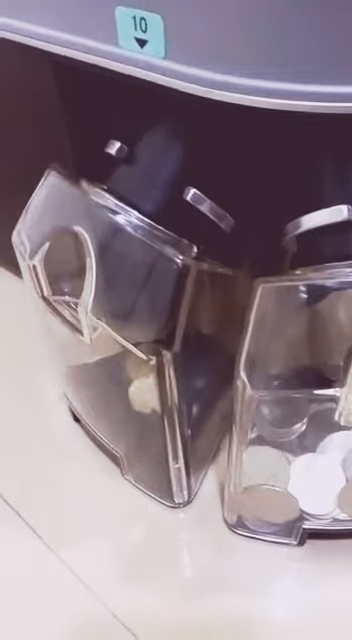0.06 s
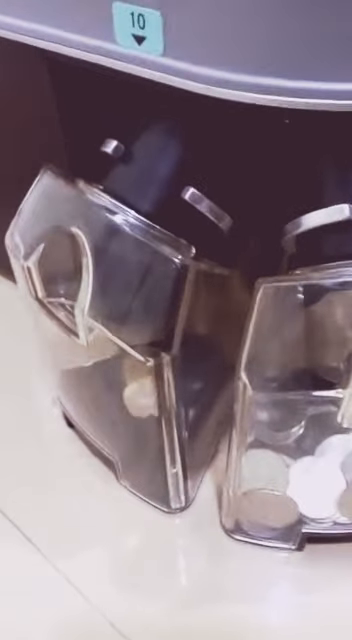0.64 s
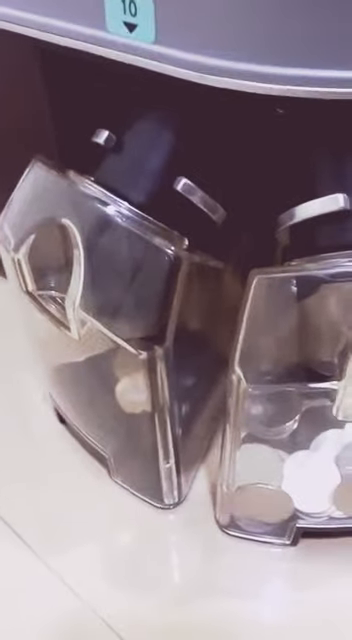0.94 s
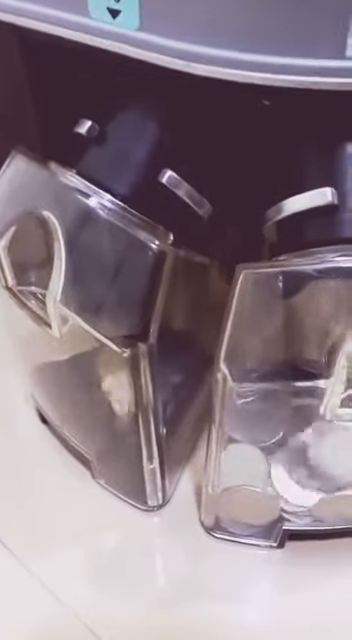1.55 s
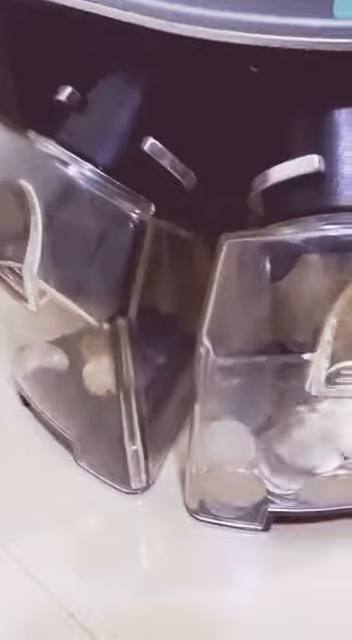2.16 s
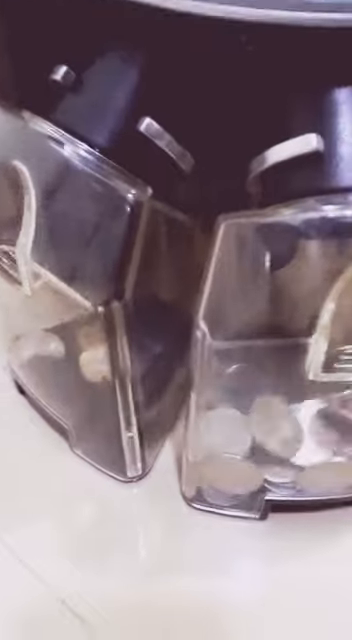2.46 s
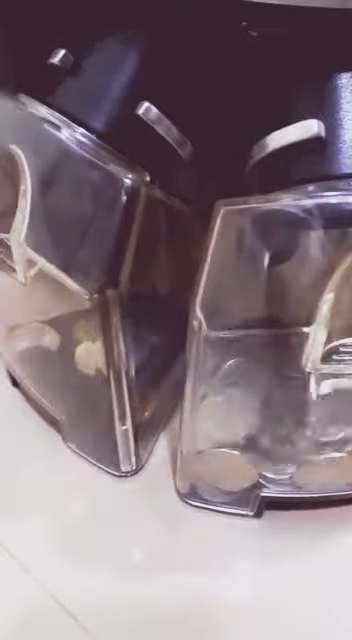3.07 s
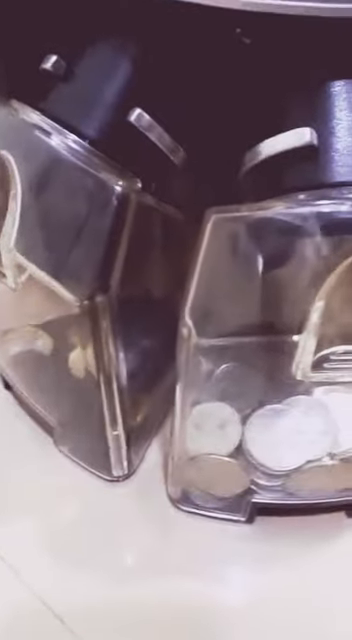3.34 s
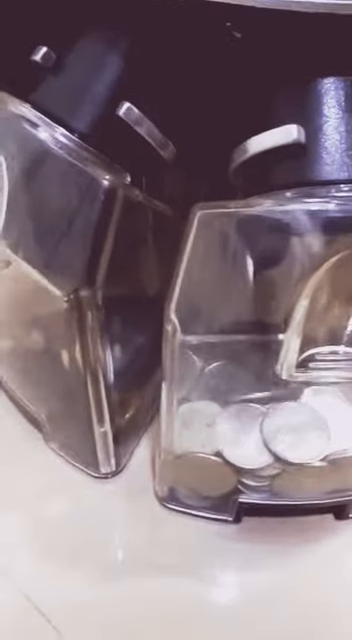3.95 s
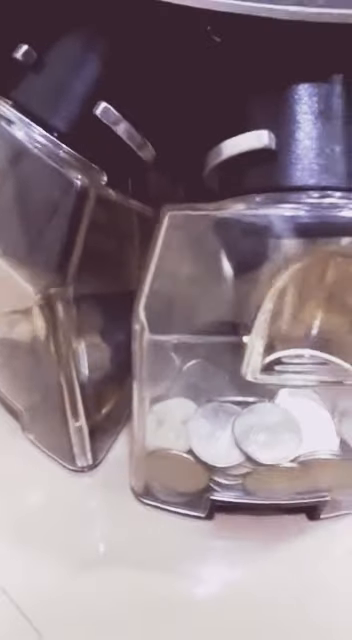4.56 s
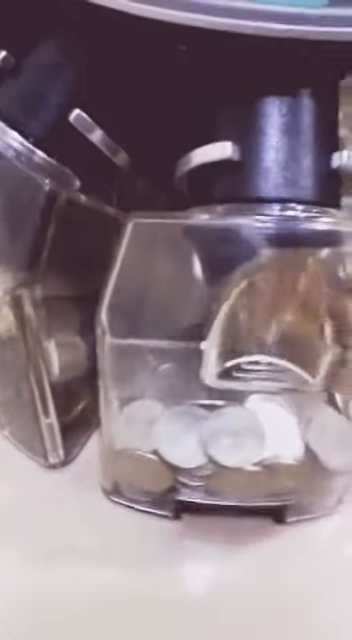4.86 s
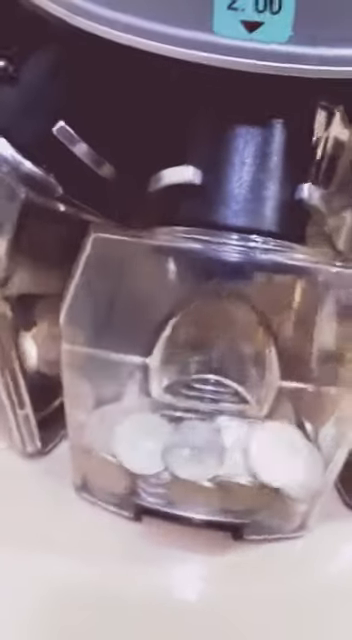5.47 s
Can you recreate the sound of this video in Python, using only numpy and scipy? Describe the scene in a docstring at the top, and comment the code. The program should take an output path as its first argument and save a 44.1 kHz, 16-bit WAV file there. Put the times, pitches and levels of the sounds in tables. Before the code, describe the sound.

Heard up close in a small room, an electric coin sorter starts with uneven scraping, a rumbling drive and sharp clacks of coin on coin. It settles into dense, bright jingling, with ringing clinks and hollow knocks as coins land in plastic bins. Toward the end the jingling dips, a single coin clunks and bounces on a bin floor, and the clatter returns.

```python
"""Coin sorter on a table

An electric coin sorter, close to a stereo pair of microphones in a small room. Its disc churns
a heap of coins in a plastic hopper, where loose ones hop and chink; coins clack along the track
and knock into plastic bins. Near the end the heap goes quiet, one coin drops hard and bounces,
then the churning picks up again."""
import sys
import numpy as np
from scipy import signal
from scipy.io import wavfile

SR = 44100
rng = np.random.default_rng(int(sys.argv[2]) if len(sys.argv) > 2 else 0)


def put_to_file(sound):
    """Save the sound as 16-bit audio at rate SR, in the file named by the first command-line argument."""
    columns = np.atleast_2d(sound).T  # one column per channel
    safe = np.clip(columns, -1, 1)
    whole_steps = np.round(safe * 32767)
    wavfile.write(sys.argv[1], SR, whole_steps.astype(np.int16))


N = 242991
TIME, AGE = np.arange(N) / SR, np.arange(SR // 5) / SR  # seconds into the scene, and after a blow
LEAD_S = 16 / SR  # travel time between the microphones

# decay of the room: pitch_hz, t60_s
ROOM_DECAY = [(100, 0.037), (600, 0.18), (3000, 0.17), (8000, 0.058), (16000, 0.07)]
# spectra of room tone, drive, scraping, buried coins and loose coins: pitch_hz, gain_db
ROOM_TONE_EQ = [(20, -17), (36, -29), (50, -30), (70, -20), (200, -0.5), (1000, -18.5), (8000, -20),
                (16000, -29)]
RUMBLE_EQ = [(25, -55), (70, -31), (100, -3), (130, -8), (160, 0.5), (205, 7), (240, 9.5), (310, -4),
             (400, 3.5), (600, -53.5)]
SCRAPE_EQ = [(150, -27), (400, -10), (600, -9), (1150, -1.5), (1500, 0), (1950, 2.5), (2400, -3.5),
             (3200, -2.5), (6000, -8.5), (16000, -77)]
CLATTER_EQ = [(1200, -31.5), (2400, -2), (3400, 1), (4300, 1.5), (5500, 2.5), (6500, 0), (7600, 3.5),
              (10000, -34), (16000, -53)]
JINGLE_EQ = [(3000, -41), (6000, 1), (7800, 0.5), (9200, 3.5), (10600, 4), (12000, 1), (13500, -3.5),
             (15500, -11.5)]

# the disc jolts against the heap and thumps the casing: start_s, level_db, pitch_hz
CASING_THUMPS = [(0.391, -30, 195), (0.652, -23.5, 156), (0.75, -15.5, 248), (0.803, -21, 228),
                 (1.192, -22, 208), (5.445, -22, 166)]
# the disc drags against the heap: start_s, length_s, scrape_db, rumble_db, singing_db, singing_hz
DISC_DRAGS = [(0.089, 0.13, -31.5, -41.5, -34, 1545), (0.281, 0.11, -33, -39.5, -54, 1450),
              (0.473, 0.15, -33.5, -44, -41, 1480), (0.63, 0.22, -33.5, -39, -35.5, 1560),
              (0.839, 0.14, -35.5, -40, -28, 1412), (1.002, 0.12, -37.5, -38, -36, 1380),
              (1.148, 0.086, -36, -39, -39, 1650), (1.78, 0.072, -31, -72, -51, 1260),
              (2.05, 0.089, -38.5, -64, -37, 1550), (2.842, 0.15, -31.5, -42, -31.5, 1423),
              (3.18, 0.22, -39.5, -48, -43, 1550), (3.777, 0.27, -40.5, -50, -40, 1470),
              (4.534, 0.066, -33, -58, -41, 1304), (4.696, 0.084, -31.5, -43.5, -47.5, 1620),
              (4.855, 0.61, -43, -46, -62, 1630), (5.416, 0.07, -34.5, -53, -47, 1680)]
DRAG_RISE_S, DRAG_T60_S, SING_SAG_HZ_PER_S = 0.027, 0.29, 370

# modes of the coins on the track, in low, middle, upper middle and high groups: pitch_hz, t60_s, level_db
TRACK_COIN_MODES = [
    [(3136, 0.037, 2.5), (3250, 0.02, -4)],
    [(4945, 0.04, 5), (5060, 0.03, -1)],
    [(5350, 0.036, 4), (5746, 0.043, 0)],
    [(7074, 0.044, 3), (7330, 0.025, -3)],
]
COIN_DETUNE = 0.006  # coins differ in size, so their rings vary in pitch by this share
# flow of coins along the track: time_s, low_ring_db, middle_ring_db, high_ring_db
TRACK_FLOW = [(0, -42, -37, -50), (.25, -59, -48, -47), (.46, -48, -38, -48), (.7, -55, -44.5, -47),
              (1.25, -45, -36.5, -38.5), (1.45, -42, -34, -34), (1.7, -36, -33.5, -33),
              (2.0, -33.5, -39, -52), (2.2, -36.5, -32.5, -37), (2.8, -41.5, -35.5, -36),
              (3.25, -36.5, -35, -44), (3.38, -41.5, -39, -32), (3.5, -39, -38, -40),
              (3.76, -39, -35.5, -34.5), (4.0, -38, -40, -36), (4.45, -36.5, -35, -36.5),
              (4.62, -35.5, -33, -38), (4.85, -49, -66, -58), (5.38, -47, -72, -51),
              (5.51, -51, -25.5, -34)]
# hard blows on the track: start_s, level_db, middle_ring_relative_db
TRACK_CLINKS = [(0.4634, -21, -12), (1.4834, -25, 8), (1.5208, -19, -1), (1.6226, -17, -4),
                (1.642, -17, -2), (1.6954, -19, 1), (1.737, -17, 1), (1.7566, -18, -11),
                (1.7716, -16.5, -0.5), (1.8673, -17, 2), (1.8876, -21.5, 8.5), (1.927, -26, -11),
                (1.971, -13.5, -14), (1.9897, -17, -15), (2.2458, -13.5, -13), (2.445, -20.5, -6),
                (2.581, -15, -13), (2.6656, -17, -11), (2.6763, -19, -15), (2.7325, -22, -11),
                (2.758, -16.5, -14), (2.834, -11, -12), (2.987, -13.5, -19), (3.079, -15, -8),
                (3.5002, -16.5, -8), (3.5139, -19.5, -16), (3.616, -14.5, -25), (3.636, -19, -17),
                (3.706, -18, -14), (3.7412, -17.5, -4), (3.8613, -20, -11), (4.2356, -19, -17),
                (4.4949, -13.5, -17), (4.657, -18, 0)]
# coins spinning on their rims: start_s, length_s, level_db, pitch_hz
COIN_SPINS = [(0.903, 0.05, -35, 5800), (1.45, 0.48, -37.5, 5770), (1.87, 0.26, -37, 4900),
              (3.3, 0.14, -29.5, 7120), (4.378, 0.04, -32, 7100), (4.87, 0.035, -36, 8840)]

# modes of a bin: pitch_hz, t60_s, level_db, left_minus_right_db
BIN_MODES = [(387, 0.072, -5, -12), (455, 0.07, -3.5, -14), (525.3, 0.095, 5, -8), (676, 0.045, -1, -4),
             (749, 0.073, 4.5, -16), (826, 0.036, 7, -12.5), (884, 0.062, 9, 9.5), (946, 0.066, 3.5, 11.5),
             (1187, 0.023, 4, 15.5), (1316, 0.03, 3.5, -11)]
BIN_DETUNE = 0.025  # spread of a bin's pitches from blow to blow, as a share
# coins knock on the bins, each spot favouring one pitch: start_s, level_db, struck_hz
BIN_KNOCKS = [(0.039, -25.5, 880), (0.093, -25, 883), (0.107, -23.5, 853), (0.12, -15.5, 850),
              (0.131, -24, 846), (0.174, -19, 413), (0.187, -21, 840), (0.213, -21.5, 500),
              (0.634, -25.5, 900), (0.667, -34, 920), (1.558, -26, 800), (1.793, -21, 1200),
              (1.85, -21.5, 540), (1.907, -26, 1010), (1.94, -23.5, 580), (2.04, -30, 510),
              (2.135, -27, 960), (2.183, -24, 940), (2.384, -27.5, 530), (2.42, -25, 412),
              (2.445, -24.5, 880), (2.478, -28, 870), (2.513, -27.5, 872), (2.552, -27, 900),
              (2.641, -24, 740), (2.648, -25, 520), (2.663, -30, 891), (2.814, -20, 885),
              (2.865, -23.5, 525), (3.162, -27, 506), (3.241, -27, 516), (3.318, -24.5, 530),
              (3.335, -27, 1000), (3.637, -25.5, 820), (3.82, -29, 880), (3.841, -21.5, 820),
              (3.89, -21.5, 864), (3.919, -30, 525), (3.936, -21, 800), (4.009, -26, 740),
              (4.106, -22, 910), (4.11, -26, 503), (4.175, -25, 910), (4.378, -27, 937),
              (4.464, -28.5, 860), (4.573, -22.5, 855), (4.602, -23.5, 980)]
# coins rattle in a bin: start_s, length_s, level_db
BIN_RATTLES = [(0.033, 0.14, -34), (0.633, 0.061, -38.5), (1.772, 0.15, -39.5), (2.03, 0.19, -43.5),
               (2.445, 0.16, -43.5), (2.76, 0.23, -43), (3.13, 0.26, -44), (3.658, 0.05, -42.5),
               (3.793, 0.13, -33.5), (4.064, 0.22, -42.5), (4.533, 0.049, -37), (4.966, 0.5, -46.5)]
RATTLE_SPILL = 0.3  # share of a rattle that reaches all modes, wherever the coin lies
# modes of the floor of the nearest bin: pitch_hz, t60_s, level_db
BIN_FLOOR_MODES = [(558, 0.03, 3), (686, 0.02, 2), (855, 0.018, -7), (1120, 0.048, -17)]
# one coin falls hard onto that floor and bounces: start_s, level_db
DROP_BOUNCES = [(4.8085, -4), (4.8225, -2), (4.838, -16), (4.852, -11.5), (4.877, -13)]
# the same coin rocks there: start_s, length_s, level_db
DROP_ROCKING = (4.826, 0.086, -34.5)

# churning of the heap in the hopper: time_s, clatter_db, jingle_db
HEAP_LEVELS = [(0.0, -22.5, -29), (0.11, -34, -36), (0.15, -52, -38), (0.17, -40, -35.5),
               (0.28, -33.5, -38), (0.35, -31.5, -30.5), (0.425, -28.5, -26), (0.437, -42, -37),
               (0.51, -28.5, -35), (0.62, -47, -42), (0.685, -40, -39), (0.72, -27.5, -33),
               (0.81, -35, -36.5), (0.92, -25, -32), (1.01, -28, -33.5), (1.28, -33.5, -34),
               (1.32, -29.5, -30), (1.53, -29, -31.5), (2.13, -26.5, -31), (2.74, -29.5, -31.5),
               (4.63, -28.5, -31), (4.78, -34, -34.5), (4.8, -58, -44), (4.86, -38, -44.5),
               (4.89, -32, -39), (4.96, -47.5, -38), (5.02, -41, -43.5), (5.38, -39.5, -43),
               (5.5, -29, -32)]
TUMBLE_HZ = 34  # mean rate of the heap's small avalanches
# flurries of small coins: start_s, length_s, level_db
FLURRIES = [(0.0, 0.11, -42), (0.177, 0.13, -39), (0.333, 0.098, -37), (0.7, 0.21, -41), (4.2, 0.17, -40),
            (4.643, 0.13, -37), (4.867, 0.11, -41)]
# sharp clacks of coin on coin: start_s, level_db
COIN_CLACKS = [(0.0074, -14), (0.0938, -8.5), (0.17, -9), (0.4473, -7.5), (0.479, -9), (0.536, -8),
               (0.592, -10.5), (0.634, -9.5), (4.653, -13), (4.779, -14), (4.808, -17), (4.8214, -8),
               (4.877, -12), (4.9478, -17), (4.9905, -18)]
# coins left ringing after they land: start_s, level_db, pitch_hz, t60_s
COIN_PINGS = [(0.347, -21, 10200, 0.076), (0.447, -17, 10440, 0.018), (4.917, -27, 8800, 0.04),
              (4.949, -18, 9670, 0.015), (4.99, -19.5, 9300, 0.015)]
# modes of a loose coin: pitch_hz, t60_s, level_db
COIN_MODES = [(9800, 0.037, -3), (10490, 0.1, 1), (11300, 0.051, -2), (12250, 0.033, -6)]
# hardest landings of loose coins on top of the heap: start_s
LANDINGS = [1.2387, 1.341, 1.4075, 1.4772, 1.6167, 1.6533, 1.6927, 1.7273, 1.767, 1.8783, 1.927, 2.0246,
            2.2037, 2.2689, 2.419, 2.491, 2.535, 2.6879, 2.789, 2.822, 2.918, 3.035, 3.129, 3.4036, 3.4412,
            3.552, 3.787, 3.9455, 4.04, 4.3404, 4.429]
HOP_DB, HOP_S = -4.5, 0.038  # relative level and spacing of the lighter hops between them


def amp(db):
    """Decibels to gain."""
    return 10 ** (np.asarray(db) / 20)


def pan(db):
    """Left and right gains; positive leans to the left microphone."""
    return amp([[db / 2], [-db / 2]])


def follow(table):
    """One gain curve for each dB column of a table."""
    times, *columns = np.transpose(table)
    return [amp(np.interp(TIME, times, db)) for db in columns]


def swell(s, length, db, rise_s, t60):
    """Gain of one event: it rises, holds to the end of its length and dies away."""
    age = TIME - s
    return np.clip(age / rise_s, 0, 1) * amp(db - 60 * np.maximum(age - length, 0) / t60)


def together(gains):
    """Independent sounds add in power."""
    return np.sqrt(sum(gain ** 2 for gain in gains))


def latest(starts):
    """Index of the most recent event at each sample."""
    return np.maximum(np.searchsorted(np.sort(starts), TIME) - 1, 0)


def curve_at(points, hz):
    """Joins points by straight lines over log frequency."""
    points_hz, values = np.transpose(points)
    return np.interp(np.log(hz + 1), np.log(points_hz), values)


def convolve(x, response):
    """Convolution along time, cut to the length of the scene."""
    return signal.oaconvolve(np.atleast_2d(x), np.atleast_2d(response), axes=1)[:, :N]


def colour(x, points):
    """Minimum-phase filter through (pitch_hz, gain_db) points."""
    log_gain = np.log(amp(curve_at(points, abs(np.fft.fftfreq(4096, 1 / SR)))))
    spectrum = np.exp(np.conj(signal.hilbert(log_gain)))
    return convolve(x, np.fft.ifft(spectrum).real[:2048])


def passband(x, hz, kind, order=4):
    """Low-, high- or band-pass filter."""
    return signal.sosfilt(signal.butter(order, hz, kind, fs=SR, output="sos"), x)


def levelled(x, band_hz=(20, 20000)):
    """Scales a pair so that its centre has rms 1 within a band."""
    return x / passband(x.mean(0), band_hz, "band").std()


def add(mix, s, sound):
    """Mixes a sound in at time s."""
    part = mix[:, max(round(s * SR), 0):][:, :sound.shape[1]]
    part += sound[:, :part.shape[1]]


def fade(t60):
    """Free decay after a blow."""
    return amp(-60 * AGE / t60)


def ring(hz, t60, lead_s=LEAD_S):
    """A struck mode, reaching the left microphone a little later."""
    age = np.maximum(AGE - np.array([[lead_s], [0]]), 0)
    return np.sin(2 * np.pi * hz * age) * fade(t60)


def impacts(per_s, spread_db):
    """Random blows of uneven strength."""
    strength = amp(spread_db * np.minimum(rng.exponential(1, N), 3))
    return strength * rng.choice([-1, 1], N) * (rng.random(N) < per_s / SR)


def crack(t60):
    """A contact scattered by the plastic walls, differently toward each microphone."""
    burst = rng.standard_normal((2, len(AGE))) * fade(t60)
    return burst / np.linalg.norm(burst[0])


def left_first(x, stray_db):
    """Sound reaches the left microphone first; a share strays round the casing to both."""
    direct = np.array([x, np.roll(x, round(LEAD_S * SR))])
    return direct + amp(stray_db) * convolve(x, crack(0.014))


def right_first(x, stray_db):
    """Sound reaches the right microphone first; a share strays round the casing to the left."""
    stray = convolve(x, crack(0.016))[0]
    return np.array([np.roll(x, round(LEAD_S * SR)) + amp(stray_db) * stray, x])


def room(x, wet_db):
    """Adds the short tail of a small room."""
    hz, t, noise = signal.stft(rng.standard_normal((2, SR // 3)), SR, nperseg=256)
    decay = amp(-60 * t / curve_at(ROOM_DECAY, hz)[:, None])
    tail = signal.istft(noise * decay, SR, nperseg=256)[1]
    tail[:, :SR // 250] = 0  # the first echo takes 4 ms
    return x + amp(wet_db) * convolve(x, tail / np.linalg.norm(tail[0]))


def room_tone(mains_hz=50):
    """Behind the machine lie the room's noise floor and a faint mains hum."""
    floor = colour(right_first(rng.standard_normal(N), stray_db=-18), ROOM_TONE_EQ)
    return amp(-56) * levelled(floor) + amp(-71) * np.sin(2 * np.pi * mains_hz * TIME)


def drive():
    """The geared drive rumbles through the casing, louder whenever the disc drags."""
    rumble = colour(right_first(impacts(per_s=560, spread_db=-1), stray_db=-12), RUMBLE_EQ)
    strains = [swell(s, length, db, DRAG_RISE_S, DRAG_T60_S) for s, length, _, db, _, _ in DISC_DRAGS]
    running = amp(-58)
    load = together([running, *strains])
    return amp(-4) * levelled(rumble, (130, 330)) * load * pan(1.6)


def thumps():
    """Each jolt rings the casing briefly, with a weaker rocking of the machine an octave below."""
    out = np.zeros((2, N))
    for s, db, hz in CASING_THUMPS:
        casing = ring(hz, 0.1) + amp(-16.5) * ring(hz / 2, 0.09)
        add(out, s, amp(db) * casing * (1 - fade(0.082)))
    return room(out, wet_db=-8)


def tumbling(depth_db, count=24):
    """Random gain of the heap's small avalanches."""
    t = TIME[::128]
    wave = sum(np.sin(2 * np.pi * (TUMBLE_HZ * (0.5 + spread) * t + phase))
               for spread, phase in rng.random((count, 2)))
    return amp(depth_db * np.interp(TIME, t, wave / wave.std()))


def drag_pitch():
    """Each drag starts singing on its own note, which sinks as the disc slows."""
    s, length, _, _, _, hz = np.transpose(DISC_DRAGS)
    drag = latest(s)
    return hz[drag] - SING_SAG_HZ_PER_S * np.clip(TIME - s[drag], 0, length[drag])


def sing(x, hz, width_hz):
    """A resonance that follows a pitch curve."""
    carrier = np.exp(2j * np.pi * np.cumsum(hz) / SR)
    pole = np.exp(-np.pi * width_hz / SR)
    sung = (carrier * signal.lfilter([1], np.poly([pole, pole]), x / carrier)).real
    return sung / sung.std()


def scraping():
    """Coin rims slip over the disc in tiny jerks, hardest in a drag, when resonances sing along."""
    slips = right_first(impacts(per_s=1000, spread_db=2.5), stray_db=0)
    scattered = np.array([impacts(per_s=900, spread_db=3) for _ in range(2)])
    scrape = colour(room(slips + amp(-1) * scattered, wet_db=-7), SCRAPE_EQ)
    scrape = passband(levelled(scrape, (1200, 2700)), 5500, "low")  # the scraping carries little treble above 5.5 kHz
    dragging = together(swell(s, length, db, DRAG_RISE_S, DRAG_T60_S)
                        for s, length, db, _, _, _ in DISC_DRAGS)
    singing = together(swell(s, length, db, DRAG_RISE_S, DRAG_T60_S)
                       for s, length, _, _, db, _ in DISC_DRAGS)
    sliding = amp(-10.5) * follow(HEAP_LEVELS)[0]  # between drags the heap slides on the disc
    friction = together([dragging, sliding]) * tumbling(depth_db=1.42)
    hz = drag_pitch()
    song = sing(slips, hz, width_hz=140) + amp(-8.5) * sing(scattered, 1.75 * hz, width_hz=270)
    return amp(-2) * scrape * friction * pan(0.21) + song * singing


def track_ring(modes, lead_s):
    """One group of coin modes after a blow on the track; every coin shifts the pitch a little."""
    shift = rng.normal(1, COIN_DETUNE)
    return sum(amp(db) * ring(hz * shift, t60, lead_s) for hz, t60, db in modes)


def track(coins=10):
    """Coins chatter along the track, right of centre; each blow rings one group of the coins' modes."""
    out = np.zeros((2, N))
    low, middle, high = follow(TRACK_FLOW)
    for modes, gain in zip(TRACK_COIN_MODES, (low, middle, amp(-5) * middle, high)):
        rung = np.zeros((2, N))
        for _ in range(coins):
            blows = impacts(per_s=480 / coins, spread_db=3.5)
            rung += convolve(blows, track_ring(modes, rng.random() * LEAD_S))
        out += gain * levelled(room(rung, wet_db=-10.5))
    return amp(-0.5) * out * pan(-4.5)


def clinks():
    """The hardest blows on the track: a faint tick, then the low and the two middle rings."""
    out = np.zeros((2, N))
    for s, db, middle_db in TRACK_CLINKS:
        low, middle, upper = (track_ring(modes, LEAD_S / 8) for modes in TRACK_COIN_MODES[:3])
        rung = low + amp(middle_db - 2) * (middle + amp(-3) * upper)
        tick = amp(-1) * crack(0.012)
        add(out, s, amp(db - 2.3) * (rung * (1 - fade(0.004)) + tick))
    return room(out, wet_db=-6.5) * pan(-2)


def spins():
    """A coin spins on its rim, and its rapid contacts keep one ring going."""
    out = np.zeros((2, N))
    for s, length, db, hz in COIN_SPINS:
        contacts = left_first(impacts(per_s=1700, spread_db=1), stray_db=0)
        rung = convolve(contacts, ring(hz, 0.07))
        out += rung / rung.std() * swell(s, length, db, rise_s=0.01, t60=0.15)
    return amp(-1.5) * out * pan(-10)


def thin_walls(x):
    """The small, thin walls of a bin radiate hardly any bass."""
    return passband(x, 360, "high")


def favour(hz, struck_hz):
    """The struck spot on a bin feeds the modes near one pitch, those above more than those below."""
    octaves = np.log2(hz / struck_hz)
    return 1 / (1 + (octaves / np.where(octaves > 0, 0.28, 0.16)) ** 2)


def bin_ring(struck_hz):
    """A blow on a bin; the coins lying inside shift its modes from blow to blow."""
    shifts = 1 + BIN_DETUNE * rng.standard_normal(len(BIN_MODES))
    blow = sum(amp(db) * favour(hz, struck_hz) * ring(hz * shift, t60) * pan(side_db)
               for (hz, t60, db, side_db), shift in zip(BIN_MODES, shifts))
    return blow / abs(blow.mean(0)).max()


def bin_rattle():
    """Coins rattle where the last one landed, in bouts that start quickly and settle slowly."""
    starts, _, struck_hz = np.transpose(BIN_KNOCKS)
    latest_hz = struck_hz[latest(starts)]
    rattle = np.zeros((2, N))
    for hz, t60, db, side_db in BIN_MODES:
        blows = impacts(per_s=320, spread_db=0.5) * (RATTLE_SPILL + favour(hz, latest_hz))
        rattle += amp(db) * convolve(blows, ring(hz, t60) * pan(side_db))
    bouts = together(swell(*row, rise_s=0.013, t60=0.59) for row in BIN_RATTLES)
    return amp(0.5) * bouts * levelled(rattle)


def bins():
    """Coins knock into the bins, rims hitting the plastic with a dry rasp, and rattle to rest."""
    knocks, contacts = np.zeros((2, N)), np.zeros((2, N))
    for s, db, hz in BIN_KNOCKS:
        add(knocks, s, amp(db + 0.5) * bin_ring(hz))
        add(contacts, s, amp(db + 18.5) * crack(0.031))
        # the coin rocks on its rim, so a second contact follows at once
        add(knocks, s + rng.uniform(0.00303, 0.00716), amp(db - 4) * bin_ring(hz))
    rasp = colour(contacts, [(500, -5.5), (1300, 12), (2000, -4), (3200, -17), (8000, -35)])
    return room(thin_walls(knocks + rasp + bin_rattle()), wet_db=-9)


def drop():
    """One coin clunks onto the floor of the bin nearest the microphones, bounces and rocks to rest."""
    clunk = sum(amp(db) * ring(hz, t60, LEAD_S / 2) for hz, t60, db in BIN_FLOOR_MODES)
    rocking = levelled(convolve(impacts(per_s=400, spread_db=0.5), clunk))
    out = rocking * swell(*DROP_ROCKING, rise_s=0.014, t60=0.15)
    for s, db in DROP_BOUNCES:
        add(out, s, amp(db - 6.5) * clunk * (1 - fade(0.008)))
    return room(thin_walls(out), wet_db=-20) * pan(-4.5)


def collisions(per_s, spread_db, crack_t60, ring_db, band_hz, coins=44):
    """Many coins collide, each with a crack and its own mode, quickly damped by its neighbours."""
    places = np.zeros((4, 2, N))  # four places in the hopper, each with its own echoes
    for k, hz in enumerate(np.geomspace(*band_hz, coins)):
        mode = ring(hz * rng.normal(1, 0.0038), t60=0.02, lead_s=rng.random() * LEAD_S)
        coin = crack(crack_t60) + amp(ring_db) * mode / np.linalg.norm(mode[0])
        blows = impacts(per_s / coins, spread_db)
        places[k % len(places)] += convolve(blows, coin * pan(rng.normal(0, 3)))
    return sum(room(place, wet_db=-3.5) for place in places)


def sparkle():
    """Small, thin coins jostle in flurries and ring at the very top of the treble."""
    thin = collisions(per_s=700, spread_db=3, crack_t60=0.015, ring_db=4,
                      band_hz=(14300, 15900), coins=8)
    thin = levelled(colour(thin, [(6000, -40), (13500, -9), (14500, -6)]))
    return amp(2.5) * thin * together(swell(*row, rise_s=0.016, t60=0.11) for row in FLURRIES)


def clacks():
    """The hardest collisions in the heap crack; now and then a coin skitters free and pings."""
    cracks, pings = np.zeros((2, N)), np.zeros((2, N))
    for s, db in COIN_CLACKS:
        add(cracks, s, amp(db + 12) * crack(0.028))
    for s, db, hz, t60 in COIN_PINGS:
        ping = convolve(crack(0.023), ring(hz, t60))
        add(pings, s, amp(db + 1.5) * ping / abs(ping).max())
    cracks = colour(cracks, [(300, -40), (1500, -3.5), (3000, 1.5), (5000, 3.5),
                             (8000, -2), (11000, -4.5), (15500, -11)])
    return room(cracks + pings, wet_db=-10) * pan(-4.5)


def chink():
    """One landing: a tick and the coin's own modes, which differ a little from coin to coin."""
    shift = rng.normal(1, 2 * COIN_DETUNE)
    rung = sum(amp(db + rng.normal(0, 3.7)) * ring(hz * shift, t60, rng.random() * LEAD_S)
               for hz, t60, db in COIN_MODES)
    tick = passband(crack(0.035), (7000, 14500), "band", order=2)
    landing = rung / np.linalg.norm(rung[0]) + amp(6.5) * tick
    return landing / np.linalg.norm(landing[0])


def hopping():
    """Loose coins land hard on top of the heap and hop at a quick, uneven beat in between."""
    out = np.zeros((2, N))
    for s, next_s in zip(LANDINGS, LANDINGS[1:] + [LANDINGS[-1] + 2 * HOP_S]):
        add(out, s, chink())
        hops = max(round((next_s - s) / HOP_S), 1)
        for k in range(1, hops):
            hop_start = s + (next_s - s) * (k + rng.normal(0, 0.15)) / hops
            add(out, hop_start, amp(HOP_DB + rng.normal(0, 2.9)) * chink())
    return amp(1) * out * pan(-3.5)


def heap():
    """In the hopper, close and to the right, buried coins clatter dully and loose ones jingle."""
    clatter_gain, jingle_gain = follow(HEAP_LEVELS)
    clatter = collisions(per_s=900, spread_db=6.5, crack_t60=0.033, ring_db=-9.5, band_hz=(3317, 6865))
    jingle = collisions(per_s=1700, spread_db=4.5, crack_t60=0.052, ring_db=-10.5,
                        band_hz=(8156, 14820))
    clatter = amp(-3.5) * levelled(colour(clatter, CLATTER_EQ) * pan(-5), (3400, 6800))
    jingle = colour(jingle, JINGLE_EQ)
    # the left microphone is shaded from the hopper, except in the highest treble
    jingle[:1] = colour(jingle[:1], [(5000, -51), (8000, -6.5), (11000, -4.5), (14000, 1.5)])
    jingle = amp(-0.16) * levelled(jingle, (8000, 15000))
    return tumbling(depth_db=0.38) * (clatter * clatter_gain + jingle * jingle_gain)


def scene():
    """The whole machine at work, heard from close by."""
    coins = heap() + hopping() + sparkle() + scraping() + track() + clinks() + spins() + clacks()
    return coins + bins() + drop() + drive() + room_tone() + thumps()


def record(dry):
    """The recorder cuts the treble above 15.6 kHz."""
    lowpass = signal.firwin(511, 15600, window=("kaiser", 9), fs=SR)
    return signal.oaconvolve(dry, lowpass[None], "same")


dry = scene()
out = record(dry)
put_to_file(out)
```